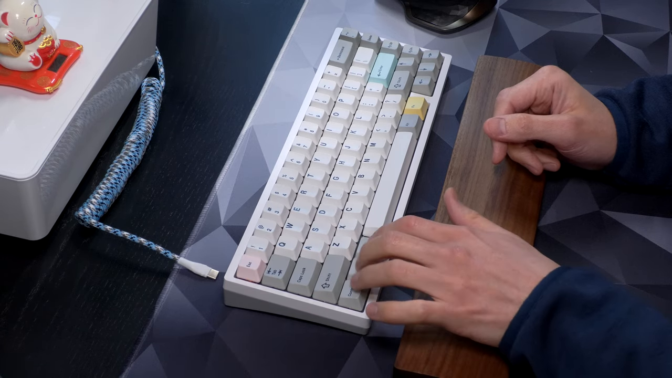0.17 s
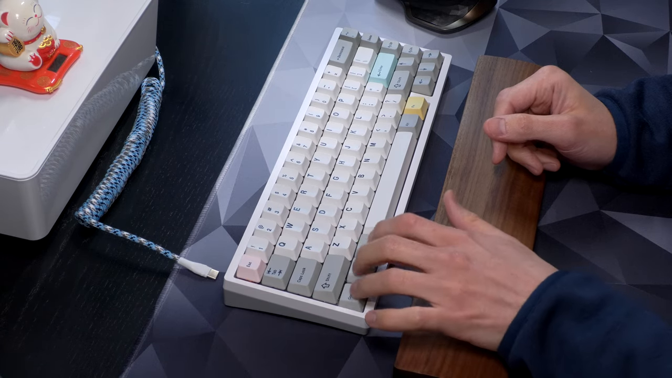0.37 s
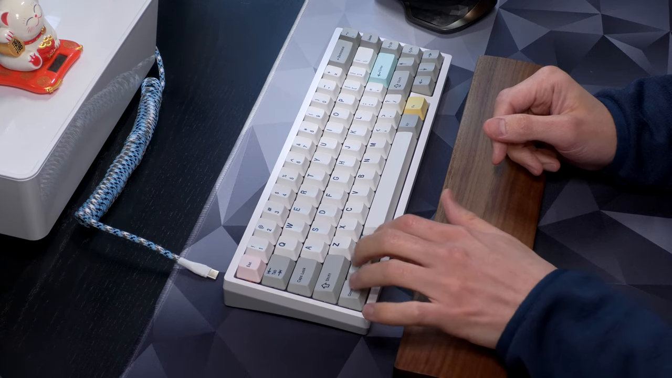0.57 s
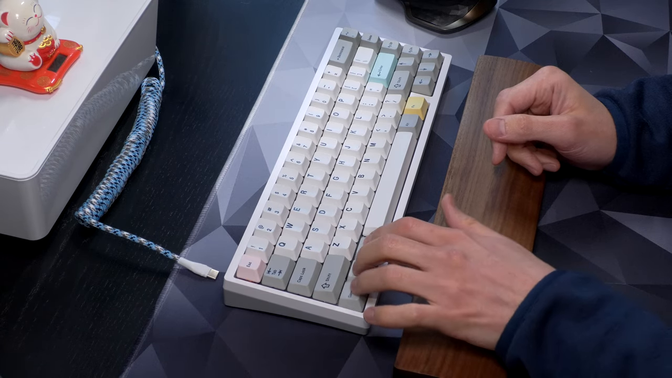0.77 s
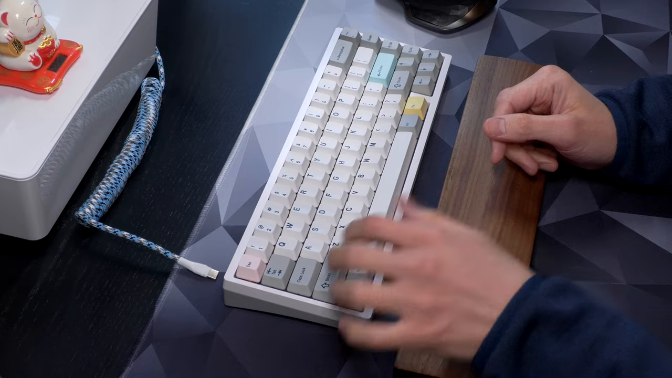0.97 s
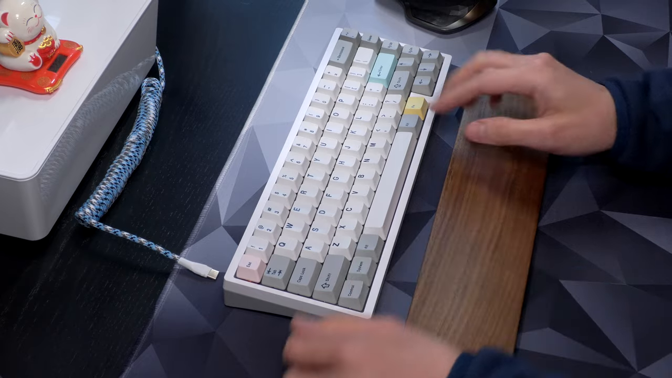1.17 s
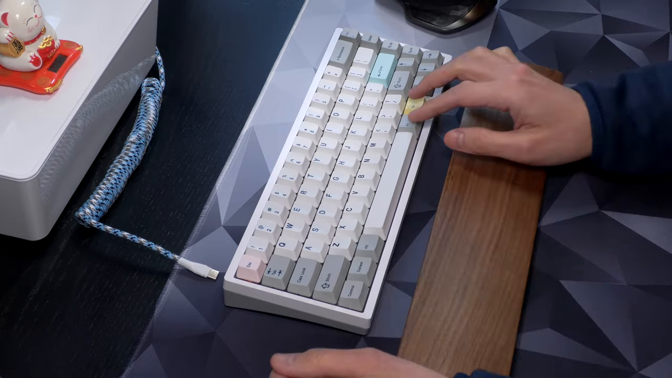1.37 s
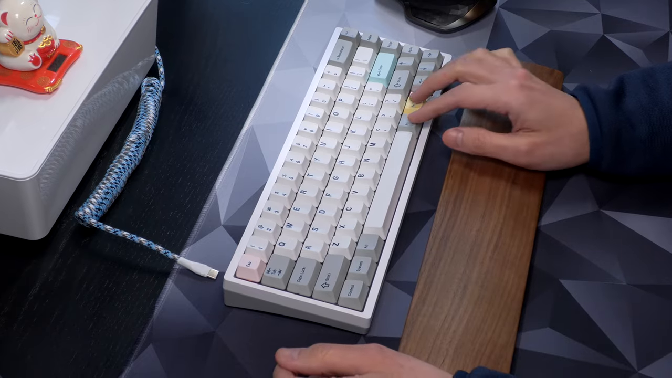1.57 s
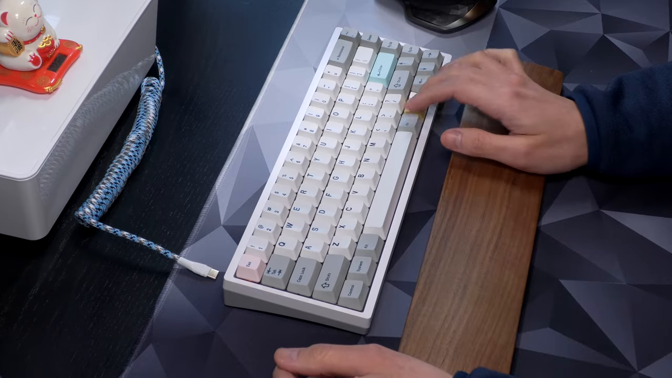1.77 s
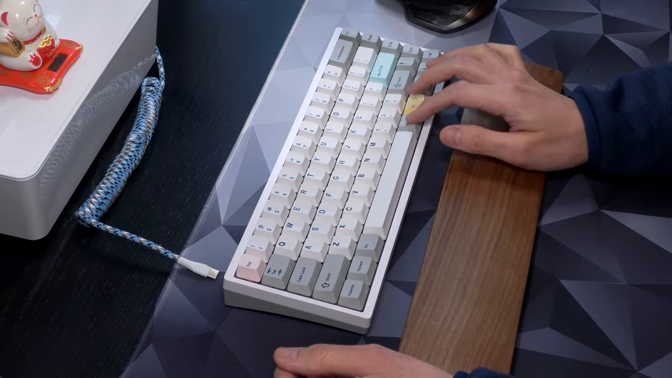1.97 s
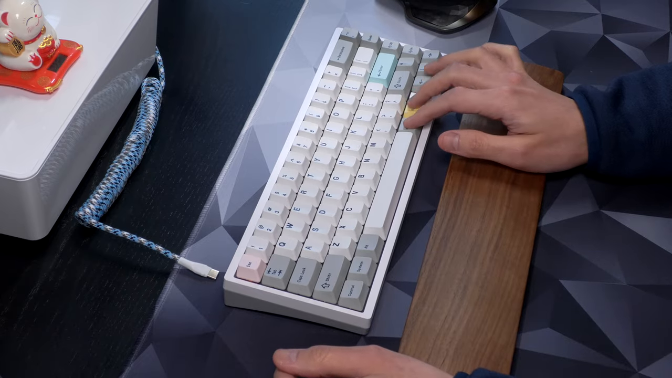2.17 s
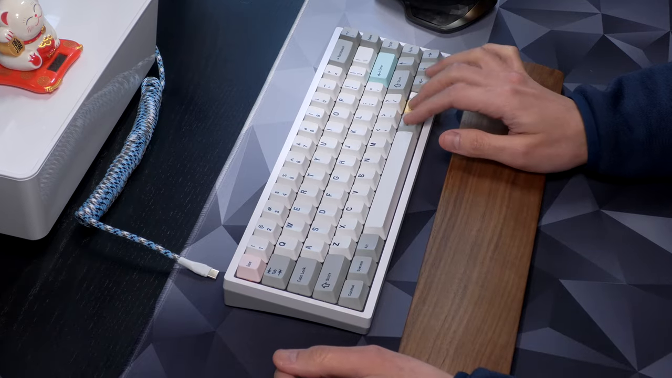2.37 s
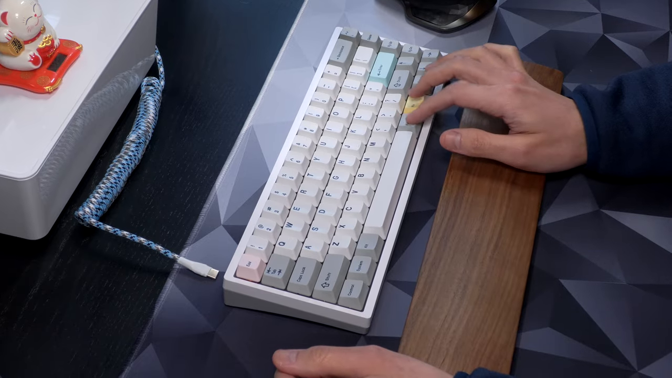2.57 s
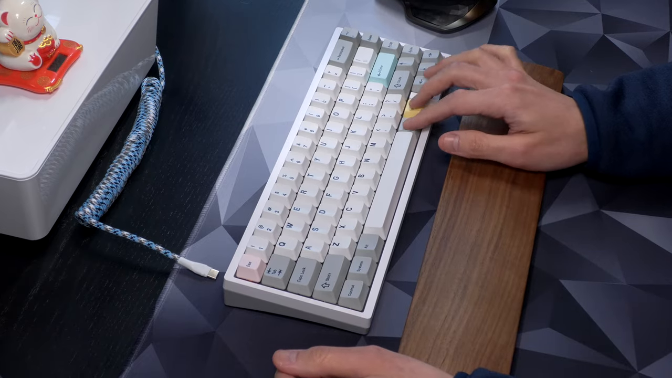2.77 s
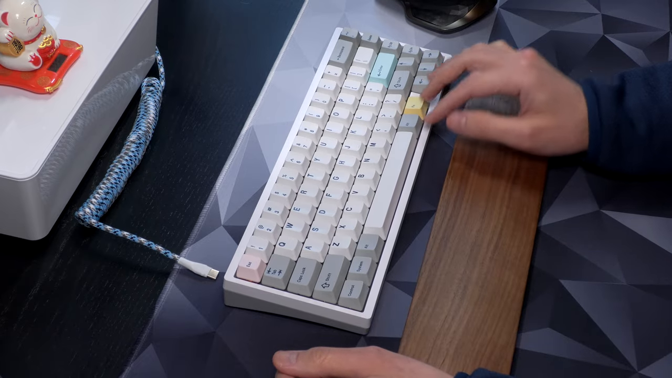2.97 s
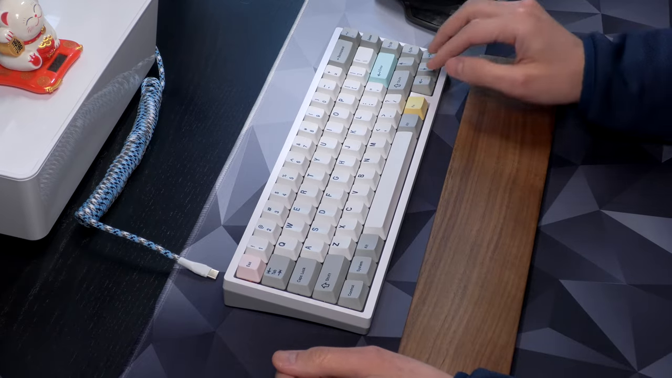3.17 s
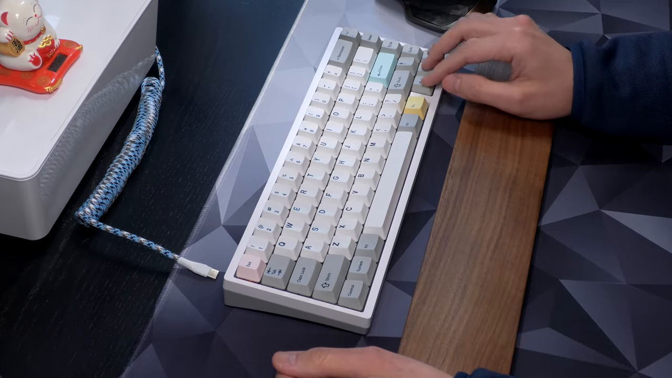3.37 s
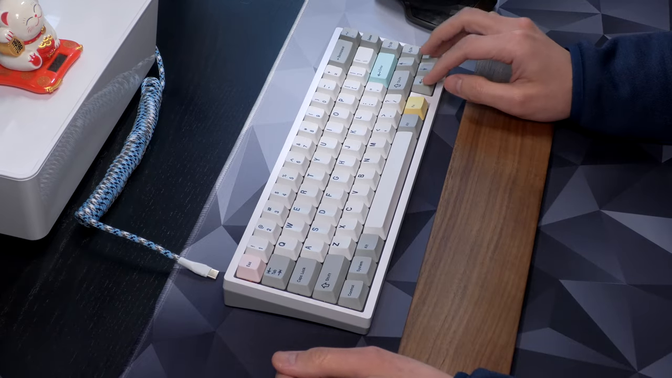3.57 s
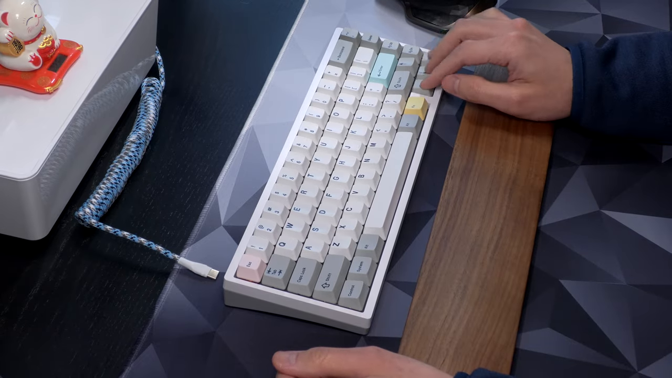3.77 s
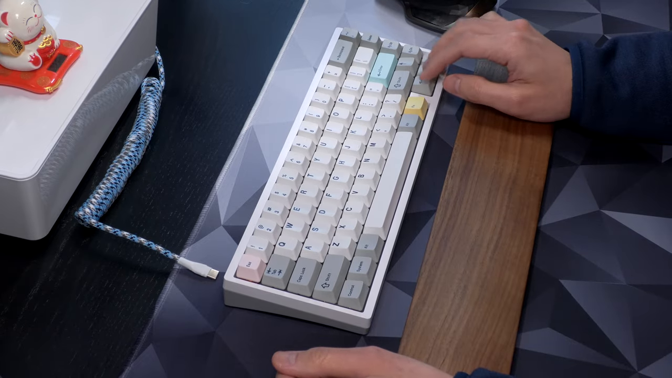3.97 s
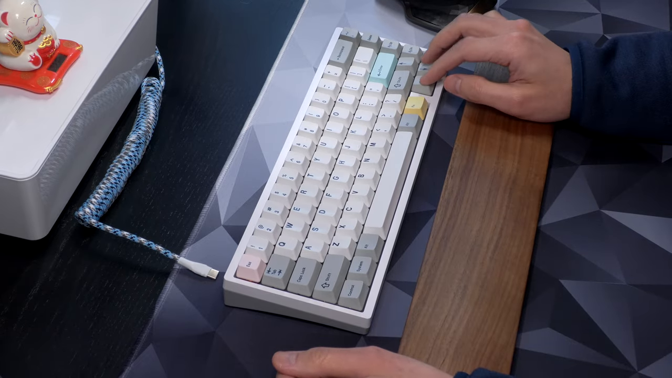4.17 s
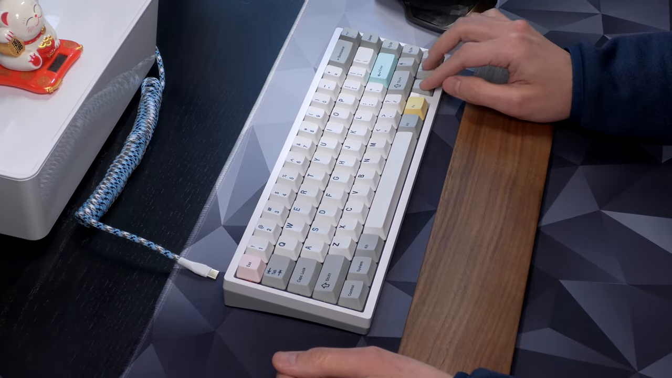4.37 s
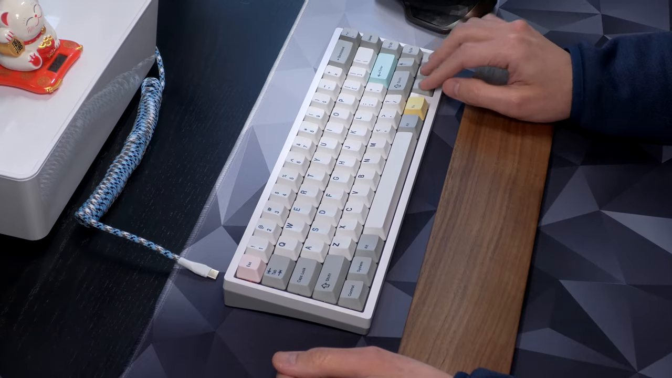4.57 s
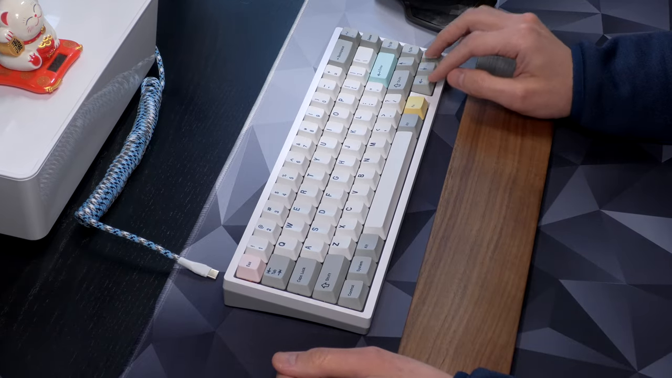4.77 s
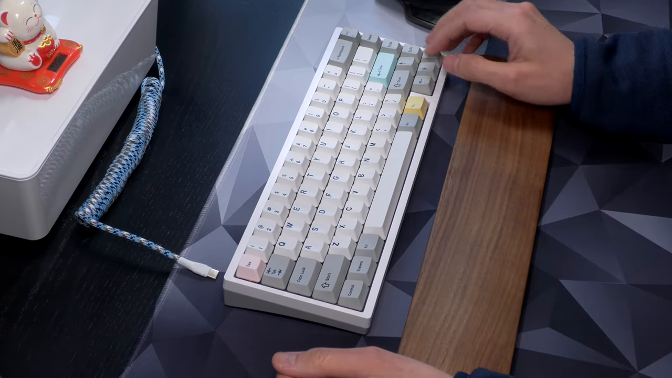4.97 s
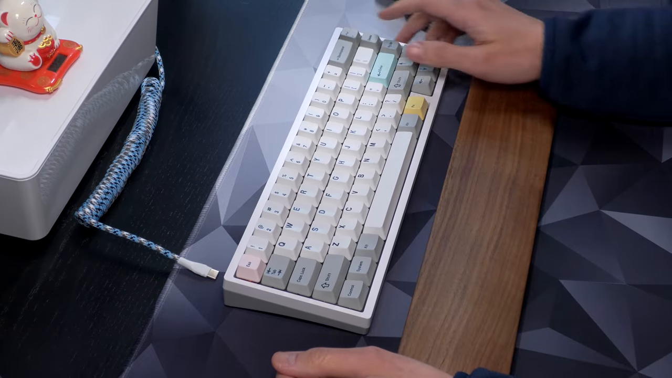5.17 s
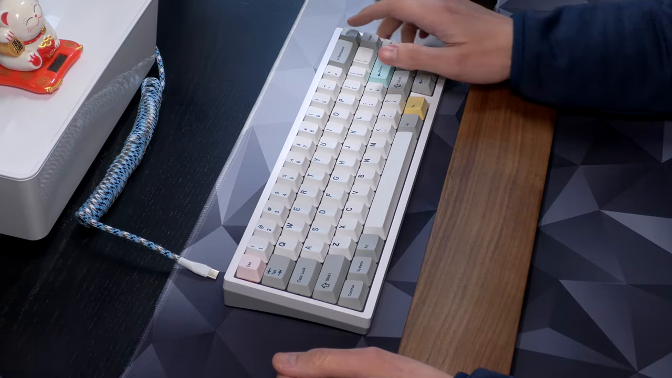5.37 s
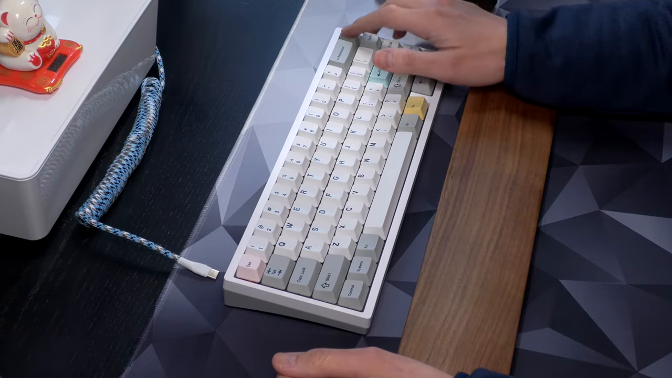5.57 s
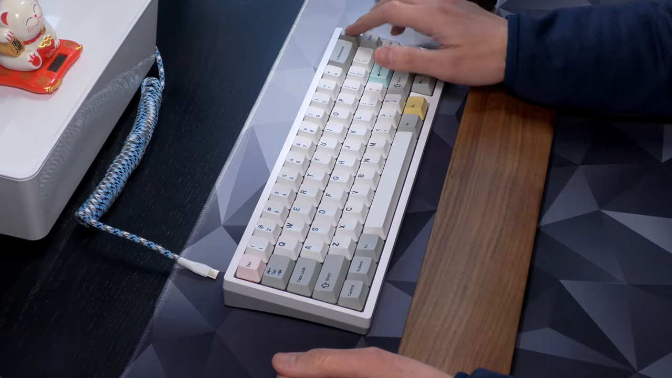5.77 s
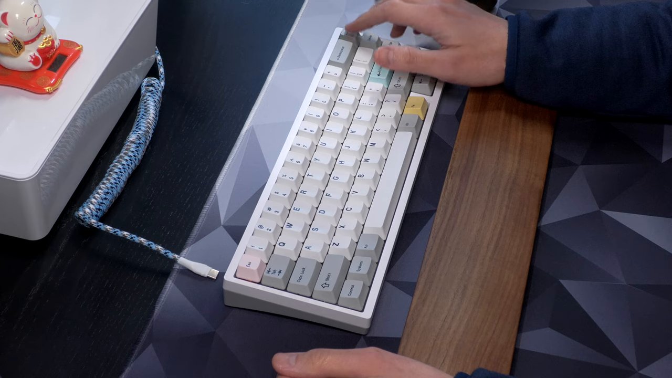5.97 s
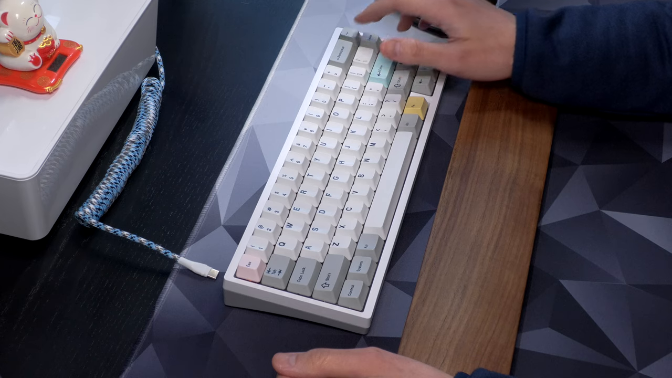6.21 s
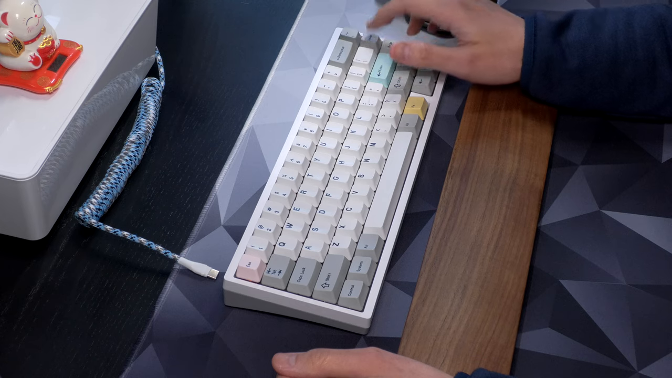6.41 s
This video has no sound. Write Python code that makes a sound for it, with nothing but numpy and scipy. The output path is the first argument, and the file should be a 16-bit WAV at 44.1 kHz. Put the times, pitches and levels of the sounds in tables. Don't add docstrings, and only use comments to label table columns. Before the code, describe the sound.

In a small quiet room, a close mono microphone hears fingers drumming mechanical keys: bright hollow clacks with small case knocks, slight metallic pings and soft mat thuds. Triplet rolls come first, then a gap with a dull wrist bump, paired strokes, a second gap, quieter triplets in quick succession, and finally four deliberate taps with softer upstrokes. Short echoes, low table rumble and steady soft hiss remain.

```python
import sys
import numpy as np
from scipy import signal
from scipy.fft import rfft, irfft
from scipy.io import wavfile
from scipy.ndimage import map_coordinates

SR = 44100
rng = np.random.default_rng(int(sys.argv[2]) if len(sys.argv) > 2 else 0)


def makeup_ratio(level_db):
    decades = np.asarray(level_db, float) / 20
    return 10 ** decades


def wav_record(signal):
    frames = np.transpose(np.atleast_2d(signal))
    bounded = np.clip(frames, -1, 1)
    quanta = np.round(bounded * 32767).astype(np.int16)
    wavfile.write(sys.argv[1], SR, quanta)


N = 284004

# t/s, cap level/dB peak, cap f/Hz, case level/dB re cap
NEAR_ROLLS = [(0.1, -27, 2550, -17.5), (0.133, -22.5, 2460, -24), (0.182, -22.5, 2890, -24.5),
              (0.212, -32, 2520, -9), (0.263, -35, 2300, -11.5), (0.326, -40, 2370, -6.5),
              (0.425, -26, 2600, -17.5), (0.468, -20, 2380, -21), (0.521, -24.5, 2770, -20.5),
              (0.554, -31.5, 1640, -11.5), (0.592, -30.5, 2360, -14.5), (0.672, -41, 1900, -5.5),
              (0.731, -24.5, 2540, -19.5), (0.774, -21.5, 2350, -19.5), (0.801, -18, 2800, -23.5),
              (0.928, -29.5, 2470, -13.5), (0.895, -37, 2340, -10), (0.864, -40.5, 2540, -2.5)]
PAIR_ROLLS = [(1.832, -19, 2360, -24.5), (1.882, -16, 2500, -20.5), (1.969, -36, 1920, -18),
              (2.035, -32.5, 2420, -8.5), (2.15, -18, 2390, -24.5), (2.215, -19.5, 2500, -17.5),
              (2.269, -24, 2190, -21.5), (2.355, -29.5, 2530, -11.5), (2.413, -24.5, 2260, -21),
              (2.474, -22, 2510, -18.5), (2.54, -30.5, 2320, -14.5), (2.622, -34.5, 2340, -6.5),
              (2.732, -18.5, 2360, -22.5), (2.788, -18, 2610, -22), (2.892, -38, 2060, -16),
              (2.945, -37, 2520, -8.5)]
FAR_ROLLS = [(3.673, -28.5, 2760, -14), (3.749, -22, 2450, -24), (3.81, -33, 2500, -23.5),
             (3.864, -37, 2300, -18), (3.883, -37, 1900, -13.5), (3.953, -36, 2380, -12.5),
             (3.978, -30.5, 2380, -14), (4.048, -23, 2680, -20), (4.098, -28.5, 2470, -24.5),
             (4.138, -39.5, 2200, -12), (4.172, -38.5, 1850, -17), (4.231, -34.5, 2360, -11),
             (4.266, -30.5, 2540, -14.5), (4.321, -24.5, 2500, -19.5), (4.372, -31, 2490, -23.5),
             (4.416, -39, 2290, -14), (4.44, -37, 1990, -17), (4.496, -30.5, 2270, -13.5),
             (4.542, -31.5, 3100, -13.5), (4.597, -28, 2570, -18), (4.641, -27, 2530, -25.5),
             (4.693, -42, 2160, -15), (4.713, -35.5, 2550, -17.5), (4.759, -42, 2150, -11.5)]
TAPS = [
    (5.568, -24.5, 2210, -16),
    (5.751, -21.5, 2400, -20),
    (5.945, -19.5, 2310, -24),
    (6.121, -20.5, 2750, -20),
    (5.65, -25, 2340, -21.5),
    (5.834, -26.5, 2340, -22.5),
    (6.02, -24.5, 2390, -20.5),
    (6.211, -28.5, 2320, -19.5),
]
# wall, stem level/dB re cap going down; wall, stem level/dB re cap coming up
NEAR_VOICES = [(-15, -32.5, -16, -29), (-21, -31.5, -23, -39), (-16, -41, -12, -29)]
PAIR_VOICES = [(-16, -29.5, -21, -32.5), (-13.5, -34, -17.5, -34.5)]
FAR_VOICES = [(-9.5, -24, -19, -35.5), (-15, -32, -19, -37), (-27, -35.5, -22, -32.5)]
TAP_VOICES = [(-13.5, -31.5, -27, -47), (-17.5, -36, -48, -45), (-24.5, -35, -52, -42),
              (-10, -34.5, -54, -42)]


def played():
    tables = [NEAR_ROLLS, PAIR_ROLLS, FAR_ROLLS, TAPS]
    voice_tables = [NEAR_VOICES, PAIR_VOICES, FAR_VOICES, TAP_VOICES]
    rows = []
    for group, (table, voices) in enumerate(zip(tables, voice_tables)):
        for k, row in enumerate(table):
            down = k // len(voices) % 2 == 0
            voice = voices[k % len(voices)]
            wall_stem_db = voice[:2] if down else voice[2:]
            rows.append((*row, *wall_stem_db, down, group))
    return np.transpose(rows)


# start t/s, main low case f/Hz for soft blows, for sharp blows, cap wall f/Hz, stem f/Hz
KEY_GROUPS = [
    (0, 1006, 991, 4070, 7230),
    (1.5, 1054, 1013, 3580, 7360),
    (3.3, 980, 1026, 4050, 8000),
    (5.2, 998, 1030, 4200, 7430),
]
# second case mode f/Hz, mat thud level/dB, top grit level/dB, low, high echo level/dB
PLACES = [
    (1440, -21.5, 7, 2, 2.5),
    (1485, -22.5, 10, -1.5, 0),
    (1445, -18.5, 4, -1, 2.5),
    (1350, -17, 9, -1, 1),
]
# f/Hz (first row takes it from PLACES), level/dB, t60/s
CASE_MODES = [(1, 0, 0.013), (1747, -3, 0.014), (1990, -2, 0.012), (891.6, -13.5, 0.049),
              (563, -25, 0.0085)]
LAG_S = 0.000697
PLATE_DB, CASE_SCATTER_DB, SLIP_TURNS = 2.0, 2.0, .07


def strokes():
    s, db, cap_hz, case_db, wall_db, stem_db, _, group = played()
    s = s + LAG_S
    group = group.astype(int)
    soft_hz, sharp_hz, wall_hz, stem_hz = np.array(KEY_GROUPS)[group, 1:].T
    second_hz, thud_db, top_db, *_ = np.array(PLACES)[group].T
    luck = rng.standard_normal((len(s), 26)).T
    sharpness = np.clip((stem_db + 35) / 6, 0, 1)
    low_hz = (soft_hz + (sharp_hz - soft_hz) * sharpness) * (1 + .015 * luck[9])
    wall_hz = wall_hz * (1 + .04 * luck[1])
    stem_hz = stem_hz * (1 + .015 * luck[5])
    contact_s, travel_s = .00013, .0009
    cap_t60_s, wall_t60_s, grit_t60_s, case_t60_s = .0052, .0026, .003, .012
    wall_level, stem_level, case_level = db + wall_db, db + stem_db, db + case_db

    push_s = contact_s * (1 + np.clip((-20 - wall_db) / 12, 0, 1.3))
    cap = ring(s, db - .6, cap_hz, cap_t60_s, push_s, 0, glide=0.07)

    rest = ring(s, wall_level + 2.5, wall_hz, wall_t60_s, contact_s, 0.57)
    rest += ring(s, wall_level + 0.5, 5550 + 0 * s, wall_t60_s, contact_s, 0.052 * luck[4])
    plate_hz = 3250 * (1 + .045 * luck[2])
    rest += ring(s + travel_s, wall_level + PLATE_DB, plate_hz, cap_t60_s, 2 * contact_s, luck[3])
    rest += ring(s, stem_level + 17.0, stem_hz, 0.0034, contact_s, luck[6])
    rest += grit(s + travel_s, wall_level - 4, 2600, 6500, .004, grit_t60_s, count=5)
    rest += grit(s, stem_level + top_db, 9300, 13500, 0.00027, wall_t60_s, count=4)

    low_s = s + travel_s * 1000 / low_hz
    rest += ring(low_s, case_level + 4.0, low_hz, case_t60_s, travel_s, SLIP_TURNS * luck[10])
    for k, (hz, mode_db, t60_s) in enumerate(CASE_MODES):
        hz = hz if k else second_hz
        level_luck, hz_luck, turn_luck = luck[11 + 3 * k:14 + 3 * k]
        level = case_level + mode_db + CASE_SCATTER_DB * level_luck
        at_s, rise_s = s + travel_s * 1000 / hz, travel_s * 800 / hz
        rest += ring(at_s, level, hz * (1 + .025 * hz_luck), t60_s, rise_s, SLIP_TURNS * turn_luck)

    rest += ring(s + .002, case_level + thud_db, 290 * (1 + .12 * luck[7]), .03, .0007, luck[8])
    rest += ring(s, wall_level - 0.5, 4650 * (1 + 0.0067 * luck[7]), 0.0037, contact_s, luck[8])

    wide = ring(s, db + 1.5, 1.01 * cap_hz, cap_t60_s / 2, contact_s / 2, 0)
    return cap + rest, wide + rest


# t/s, level/dB peak, f/Hz, cap level/dB re ping
PINGS = [
    (0.1487, -31.5, 7040, -13),
    (0.7789, -41, 7350, -9),
    (1.9087, -64, 7560, -12),
    (2.4379, -61, 7260, -3),
    (4.0553, -34.5, 7240, -13),
    (4.3304, -62, 8200, -12),
    (4.6044, -56, 8250, -1),
]


def pings():
    s, db, hz, cap_db = np.transpose(PINGS)
    s = s + LAG_S
    luck = rng.standard_normal((len(s), 2)).T
    out = ring(s, db, hz, 0.0077, 0.00013, luck[0])
    out += grit(s, db + cap_db + 12, 2400, 5500, 0.00145, 0.0045, count=6)
    return out + ring(s, db + cap_db, 1500 + 0 * hz, 0.014, 0.0014, luck[1])


# t/s, level/dB peak, f/Hz
TOUCHES = [(0.028, -46.5, 2010), (0.4452, -49, 2470), (1.39, -48, 3520), (1.867, -37, 2630),
           (2.129, -44.5, 2620), (2.765, -42, 1900), (3.715, -48, 3010), (4.018, -46, 2620),
           (4.2868, -46, 1500), (4.576, -42, 2880), (5.5567, -37, 2330), (5.7264, -48, 2380),
           (5.917, -50.5, 2400), (6.1005, -46, 3030)]


def touches():
    s, db, hz = np.transpose(TOUCHES)
    hollow = ring(s + LAG_S, db - 6.0, hz, 0.0042, 0.00019, rng.random(len(s)))
    return hollow + grit(s - .003, db - 4.5, 510, 6300, 0.015, 0.0016, count=24)


# t/s, level/dB peak, f/Hz, t60/s
WRIST = [
    (1.269, -51, 198, 0.031),
    (1.266, -53, 343, 0.016),
    (1.268, -50, 600, 0.005),
    (1.2675, -56, 1050, .006),
    (1.268, -54, 1550, .006),
    (1.287, -60, 265, 0.018),
    (1.288, -55, 1540, .012),
    (1.389, -62, 1690, .012),
]


def wrist():
    out = 0
    for s, db, hz, t60_s in WRIST:
        out = out + ring(np.array([s]), np.array([db]), hz, t60_s, 1 / hz / 2, 0)
    return out


# t/s, level/dB peak, rise/s, t60/s
ROCKS = [(.03, -57, 0.036, 0.73), (.18, -52.5, .04, 0.99), (.5, -51.5, 0.029, 0.92), (.77, -51.5, 0.06, 1),
         (1.31, -50, 0.023, 1), (1.83, -49.5, .025, 0.46), (1.97, -51, 0.025, 0.52), (2.15, -48, 0.024, .5),
         (2.42, -54, .03, 1), (2.75, -52, 0.018, 1), (3.39, -56, 0.012, 0.86), (3.73, -54, .04, 1),
         (4.07, -53, 0.018, 0.7), (4.34, -56, .03, .8), (4.61, -52.5, 0.018, 1), (5.72, -54.5, 0.037, 0.73),
         (5.95, -52.5, .03, 0.53), (6.12, -54, 0.027, .5)]
# t/s, level/dB peak, rise/s, t60/s
SHOVES = [(0, -52.5, 0.0013, 0.96), (.15, -47, 0.071, 0.42), (.42, -57, 0.022, 0.59),
          (.5, -51, 0.057, 0.79), (.73, -58.5, 0.021, 1.8), (1.295, -49, 0.02, 0.89),
          (1.9, -49.5, 0.068, .7), (2.22, -53.5, 0.064, 0.76), (2.42, -53.5, 0.052, 0.7),
          (2.73, -49.5, 0.15, 0.67), (3.39, -62, 0.027, 1.1), (3.68, -56.5, 0.033, 1.4),
          (3.9, -57.5, 0.085, 0.94), (4.1, -54.5, 0.066, 0.6), (4.31, -54, 0.082, 0.88),
          (4.61, -49.5, 0.13, 0.66), (4.93, -67, 0.096, 3.2), (5.575, -53.5, 0.036, 0.77),
          (5.95, -54.5, 0.11, 0.58), (6.2, -59.5, 0.066, 1.2)]
# lower, upper thump level/dB
THUMPS = [(-66.5, -68), (-67.5, -69.5), (-72.5, -68), (-58.5, -62)]
THUMP_RISE_S = (.01, .006)
THUMP_T60_S = (.35, .15)
WRIST_THUMP_S = (1.285, 1.262)
WRIST_THUMP_DB = (-43, -62.5)
REST_DB = [-74, -75, -90, -95]
# f/Hz, level/dB, driver (0 rocks, 1 shoves, 2 lower, 3 upper thumps), pitch wander share
DESK_MODES = [(38.5, -3, 0, .08), (26, -19, 0, .1), (60.5, 0, 1, .025), (85, -7, 2, .03),
              (112, -3, 2, .025), (142, -8, 3, .04), (170, -2, 3, .025)]


def desk():
    s, *_, down, group = played()
    thump_db = np.array(THUMPS)[group.astype(int)]
    levels = [sum(swell(*row) for row in ROCKS), sum(swell(*row) for row in SHOVES)]
    for k in range(2):
        at_s = np.append(s[down > 0], WRIST_THUMP_S[k])
        db = np.append(thump_db[down > 0, k], WRIST_THUMP_DB[k])
        db = db + 2.0 * rng.standard_normal(len(at_s)) * (at_s != at_s[-1])
        levels.append(swell(at_s, db, THUMP_RISE_S[k], THUMP_T60_S[k]))
    out = 0
    for hz, mode_db, driver, wander in DESK_MODES:
        phase = 2 * np.pi * np.cumsum(hz * (1 + wander * walk(14.))) / SR
        level = np.hypot(levels[driver], makeup_ratio(REST_DB[driver])) * makeup_ratio(mode_db + 0.25 * walk(12.0))
        out = out + np.sqrt(2) * level * np.sin(phase)
    return out


# f/Hz, level/dB, t60/s
ROOM_BANDS = [(713, -26, 0.059), (1336, -28, 0.23), (2233, -30.5, 0.24), (3510, -32.5, 0.29),
              (5290, -35.5, 0.46), (7500, -38.5, 0.037)]


def room(x):
    t = np.arange(int(SR / 4)) / SR
    arrive = np.clip((t - .002) / .003, 0, 1) * (1 + 2.2 * np.exp(-t / .011))
    starts_s = np.array(KEY_GROUPS)[:, 0]
    group = np.searchsorted(starts_s, np.arange(N) / SR, side="right")
    out = 0
    for k in np.unique(group):
        echoes = rng.standard_normal(len(t)) * makeup_ratio(6 * rng.standard_normal(len(t)))
        tail = 0
        for hz, db, t60_s in ROOM_BANDS:
            part = band(echoes, hz / 1.483, hz * 1.33) * arrive * np.exp(-np.log(1000) * t / t60_s)
            db += PLACES[k - 1][3 if hz < 1500 else 4]
            tail = tail + makeup_ratio(db) * part / np.sqrt(np.sum(part ** 2) * SR / hz) * 10
        out = out + signal.fftconvolve(x * (group == k), tail)[:N]
    return out


# f/Hz, level/dB per Hz
HISS = [(20, -20), (60, 16), (115, 3.5), (360, -4), (1100, -6), (1700, -6.5), (6000, -8), (15700, -8)]
HISS_DB = -64.5


def hiss():
    f = np.maximum(np.arange(N // 2 + 1) * SR / N, 1)
    hz, db = np.transpose(HISS)
    gain = makeup_ratio(np.interp(np.log(f), np.log(hz), db)) * (f > 15) * (f < 15800)
    x = irfft(rfft(rng.standard_normal(N)) * gain, N)
    return x * makeup_ratio(HISS_DB) / x.std()


def ring(s, db, hz, t60, rise, turn, glide=0):
    start = np.floor(s * SR).astype(int)
    steps = np.arange(int(SR * (t60 + 4 * np.max(rise))))
    hz, rise, turn = (np.reshape(v, (-1, 1)) for v in (hz, rise, turn))
    t = np.maximum((steps - (s * SR - start)[:, None]) / SR, 0)
    shape = (1 - np.exp(-t / rise)) ** 2 * np.exp(-np.log(1000) * t / t60)
    shape /= shape.max(axis=1, keepdims=True)
    bent = t + glide * 3 * rise * (1 - np.exp(-t / (3 * rise)))
    wave = makeup_ratio(db)[:, None] * shape * np.sin(2 * np.pi * (hz * bent + turn))
    return np.bincount((start[:, None] + steps).ravel(), wave.ravel(), N + len(steps))[:N]


def grit(s, db, lo_hz, hi_hz, spread, t60, count):
    luck = rng.random((len(s), count, 4))
    when = s[:, None] + spread * luck[..., 0] ** 2
    hz = lo_hz * (hi_hz / lo_hz) ** luck[..., 1]
    size_db = db[:, None] - 10 * luck[..., 2] - 12 * luck[..., 0]
    return ring(when.ravel(), size_db.ravel(), hz.ravel(), t60, .00012, luck[..., 3].ravel())


def swell(s, db, rise, t60):
    return ring(np.atleast_1d(s), np.atleast_1d(db), 0, t60, rise, 1 / 4)


def walk(rate_hz):
    knots = rng.standard_normal(int(N / SR * rate_hz) + 4)
    x = map_coordinates(knots, [1 + np.arange(N) / SR * rate_hz], order=3)
    return x / x.std()


def band(x, lo_hz, hi_hz, order=2):
    sos = signal.butter(order, [lo_hz, min(hi_hz, .45 * SR)], "band", fs=SR, output="sos")
    return signal.sosfilt(sos, x)


def scene():
    near, spread = strokes()
    small = pings() + touches() + wrist()
    return (near + small + room(spread + small) + desk() + hiss())[None, :]


def roll_off(x):
    return signal.sosfilt(signal.butter(12, 16470, fs=SR, output="sos"), x)


def record(dry):
    top = signal.ellip(10, .1, 70, 16300, fs=SR, output="sos")
    mix = signal.sosfilt(top, dry)
    return roll_off(mix)


dry = scene()
out = record(dry)
wav_record(out)
```